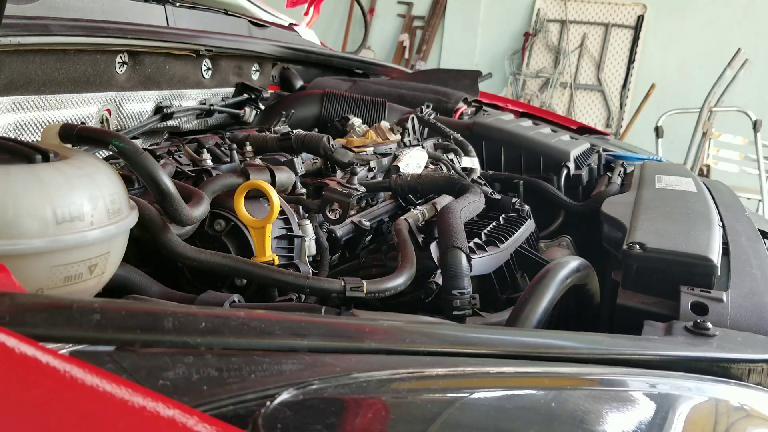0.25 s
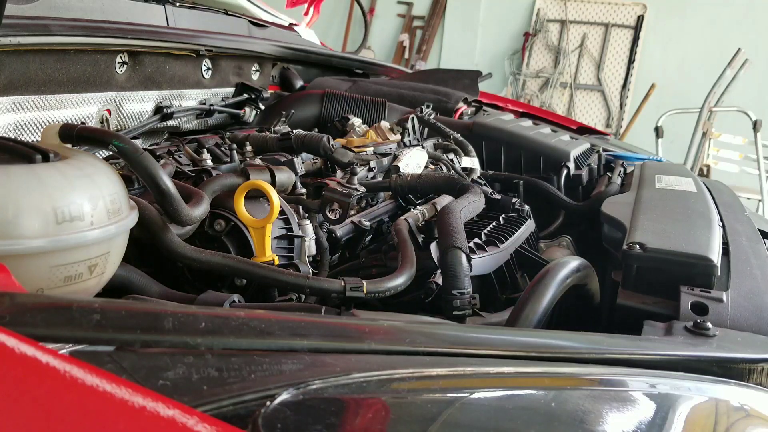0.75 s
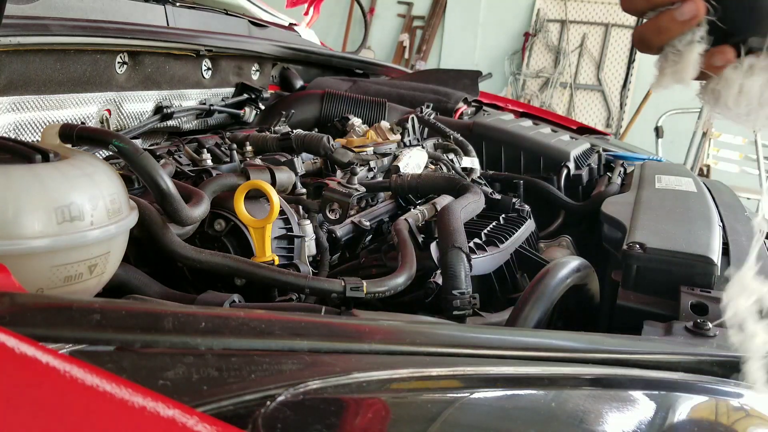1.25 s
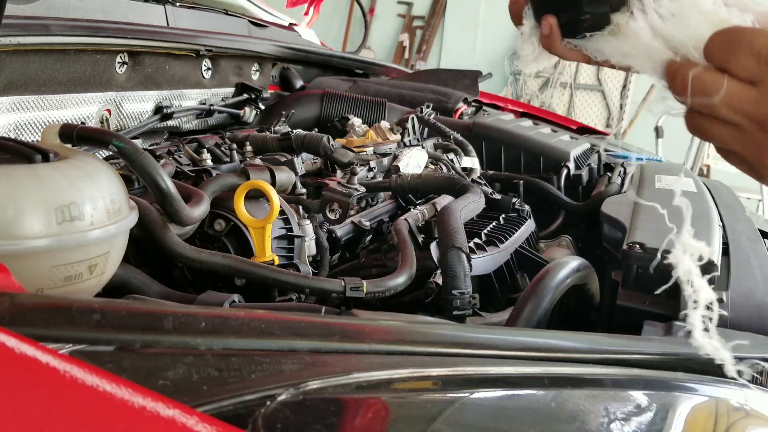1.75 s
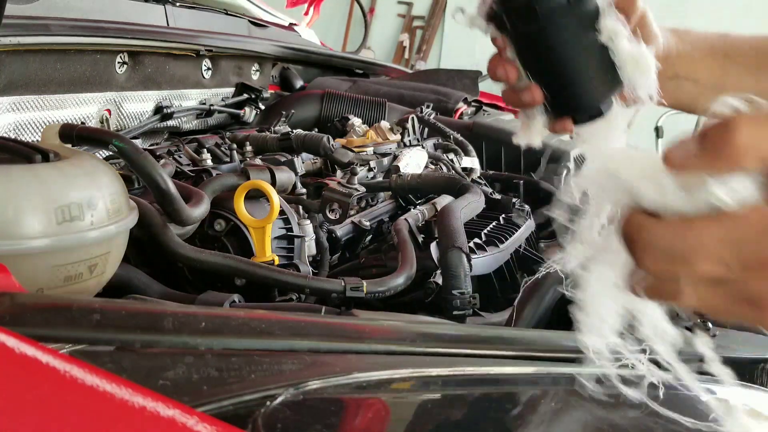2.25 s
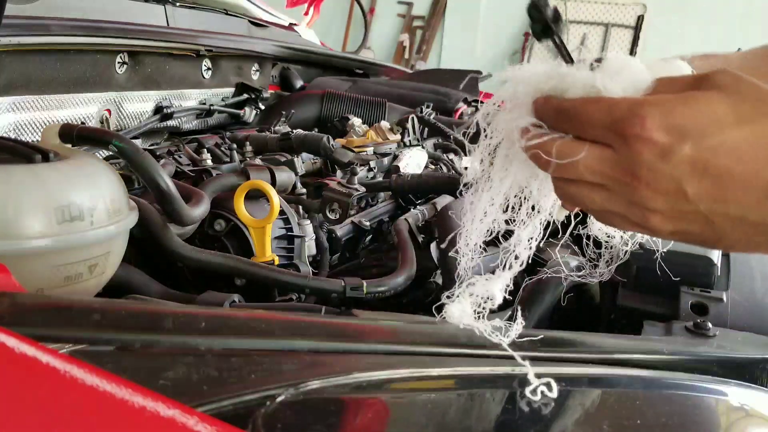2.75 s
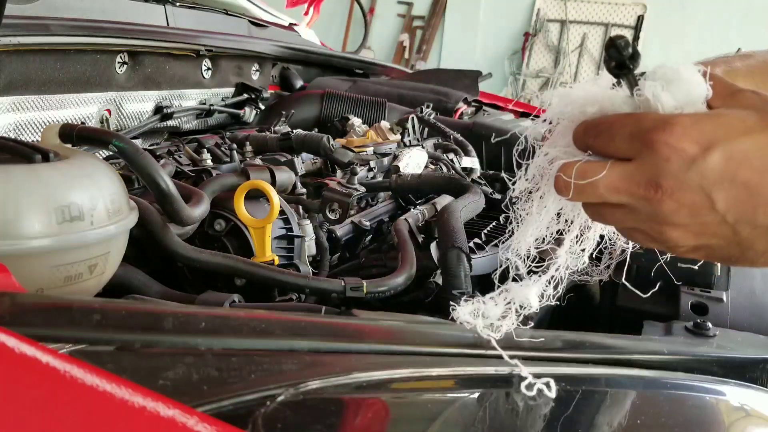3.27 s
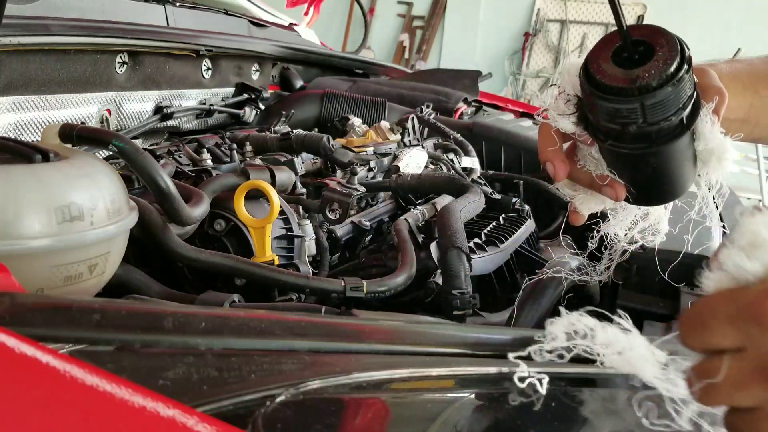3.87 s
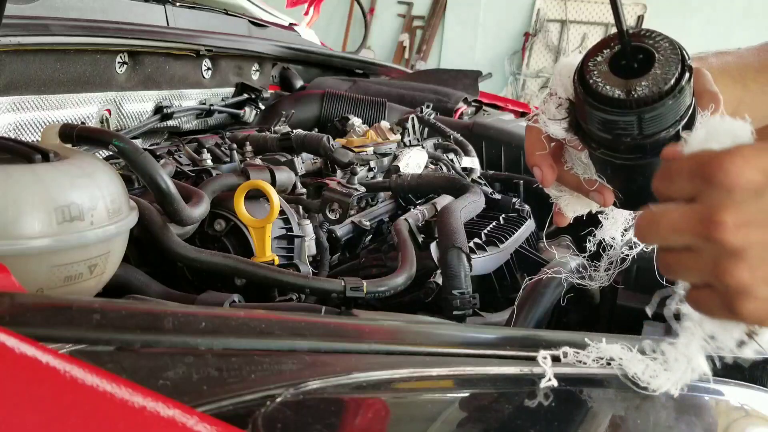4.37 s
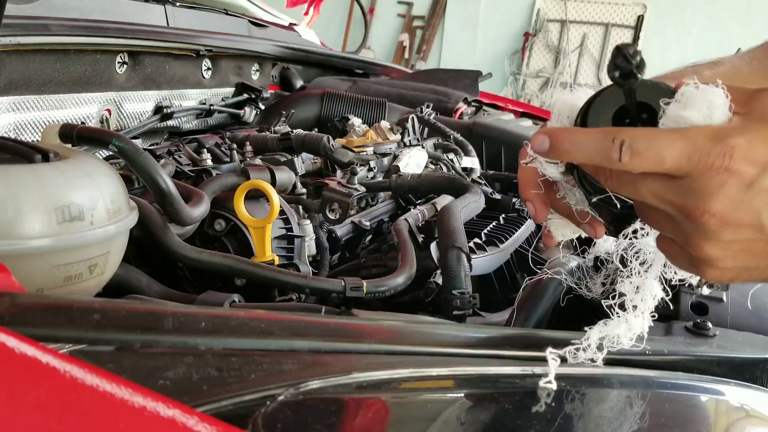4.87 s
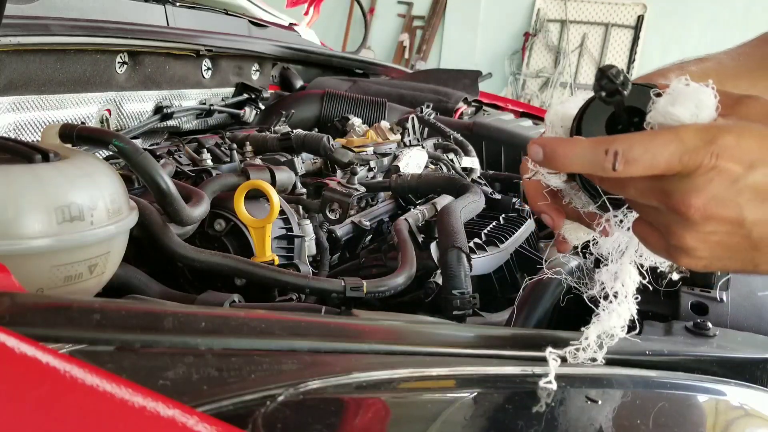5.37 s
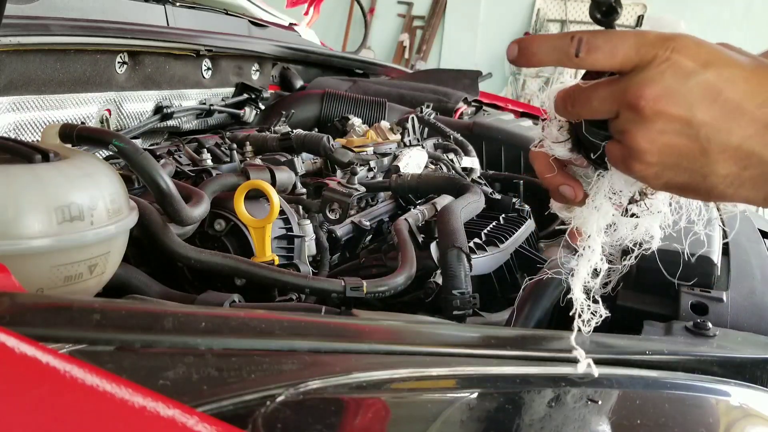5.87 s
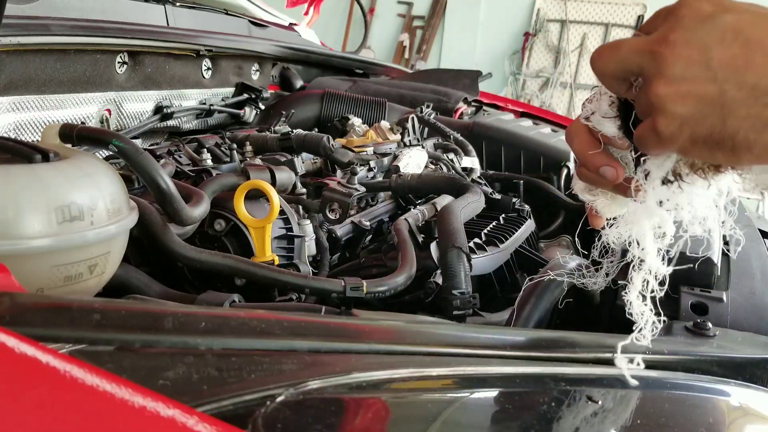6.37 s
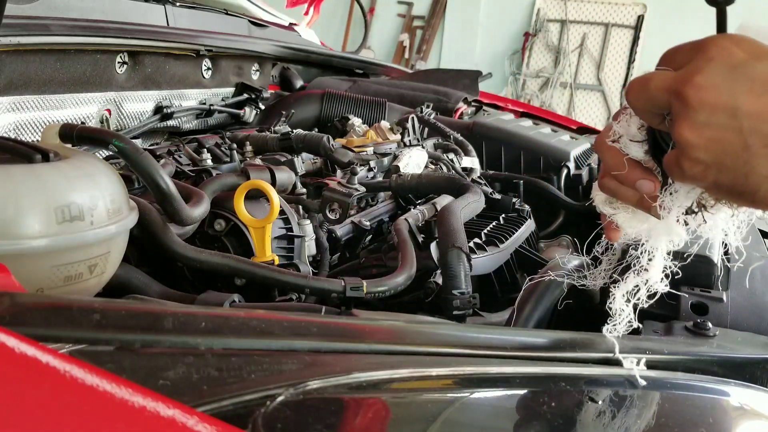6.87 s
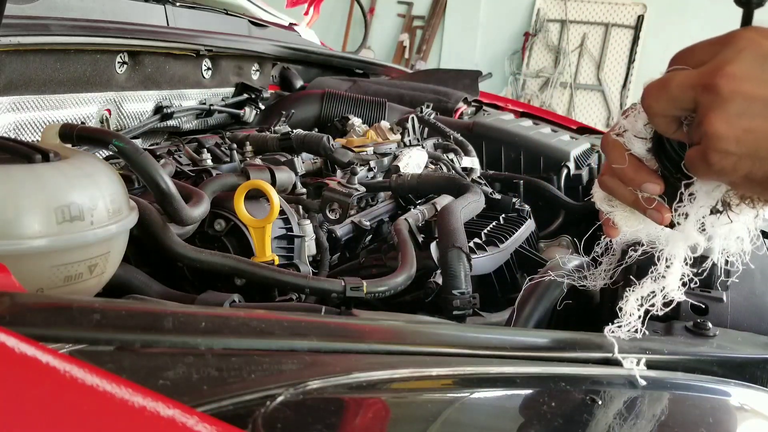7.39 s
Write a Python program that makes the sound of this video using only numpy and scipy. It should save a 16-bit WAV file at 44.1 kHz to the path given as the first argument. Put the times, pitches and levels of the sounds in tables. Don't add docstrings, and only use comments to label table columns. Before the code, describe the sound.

From a garage, a lumpy, throaty car exhaust swells, drops in pitch at a gear change, sweeps past and recedes, leaving cloth rustle and small ticks.

```python
import sys
import numpy as np
from scipy import signal
from scipy.fft import rfft, irfft
from scipy.io import wavfile
from scipy.ndimage import uniform_filter1d

SR = 44100
rng = np.random.default_rng(int(sys.argv[2]) if len(sys.argv) > 2 else 0)


def master_out(mix):
    frames = np.transpose(np.atleast_2d(mix))
    ceiling = np.clip(frames, -1, 1)
    pcm = np.round(ceiling * 32767).astype(np.int16)
    wavfile.write(sys.argv[1], SR, pcm)


def boost(x):
    u = np.asarray(x, float) / 20
    return 10 ** u


N = 336483
SLOW_RATE = 100

# frequency in Hz, level in dB.
PATH = [(30, -34.5), (50, -0.5), (75, 4), (100, 11.5), (125, 13.5), (150, 10), (180, 3), (215, -2.5),
        (240, -7.5), (280, -4.5), (315, -16.5), (350, -6.5), (410, -8), (500, -24)]
FAMILIES = {"low": (-49.5, 0.1, -42.5, 0.2), "firing": (-23, 1.4, -32.5, 1.07),
            "above": (-38, 2.1, -38, 1.94), "bark": (-42, -0.2, -23.5, 1.4),
            "growl": (-46.5, 0.38, -29, 1.92), "high": (-46.5, 0.5, -39.5, 0.82),
            "boom": (-53, .05, -45.5, 0.65), "rumble": (-36, -0.05, -25, 1.14)}


def evened(x):
    return x / np.sqrt(np.mean(abs(x) ** 2) + 1e-20)


def read(points, hz):
    f, value = np.transpose(points)
    return np.interp(np.log(hz + 1), np.log(f + 1), value)


def curves(rows, t):
    seconds, *columns = np.transpose(rows)
    return [np.interp(t, seconds, column) for column in columns]


def bumps(events, t):
    return sum(db * np.exp(-((t - s) / half) ** 2) for s, half, db in events)


def add(mix, s, sound):
    part = mix[round(s * SR):][:len(sound)]
    part += sound[:len(part)]


def resonate(x, hz, width):
    turn = np.exp(2j * np.pi * np.cumsum(hz * np.ones(len(x))) / SR)
    r = np.exp(-np.pi * width / SR)
    return 2 * (turn * signal.lfilter([1 - r], [1, -r], x / turn)).real


def resonate_twice(x, hz, width):
    return resonate(resonate(x, hz, width), hz, width)


def coloured(shape, patchy_db):
    frames, hz = N // 256 + 5, np.fft.rfftfreq(1024, 1 / SR)
    a, b, patches = rng.standard_normal((frames, 513, 3)).T
    patches = uniform_filter1d(patches, size=8, axis=0)
    patches = evened(uniform_filter1d(patches, size=12, axis=1))
    z = (a + 1j * b) * boost(read(shape, hz)[:, None] + patchy_db * patches)
    return evened(signal.istft(z, nperseg=1024, noverlap=768)[1][:N])


def wander(steps, hz):
    z = rng.standard_normal(steps) + 1j * rng.standard_normal(steps)
    smoothing = np.exp(-(np.fft.fftfreq(steps, 1 / SLOW_RATE) / hz) ** 2)
    return evened(np.fft.ifft(np.fft.fft(z) * smoothing))


def slow_times():
    return np.arange(N * SLOW_RATE // SR + 2) / SLOW_RATE


def swing(turns, size):
    t, slow = np.arange(N) / SR, np.arange(len(size)) / SLOW_RATE
    angle = 2 * np.pi * turns
    across = np.interp(t, slow, size.real) * np.cos(angle)
    along = np.interp(t, slow, size.imag) * np.sin(angle)
    return np.sqrt(2) * (across - along)


def family_db(name, t):
    # time in seconds, dB under the loudest.
    exhaust_loudness = [(0, -10.5), (.6, -7), (1.2, -2.5), (1.6, -1), (2.2, -3), (2.45, -6), (3, -2.5),
                        (3.5, -3.5), (4.2, -1), (4.8, -2.5), (5.15, -9), (5.5, -12.5), (5.65, -16.5),
                        (6, -18.5), (6.6, -32.5), (7.63, -29.5)]
    shift_times = [2.19, 2.31]
    street_echoes = {"low": [(1.4, 0.16, 4), (2.21, .07, -16.5), (6.64, 0.86, -10), (3.27, 0.15, -10.5),
                     (4.95, 0.095, 9.5)], "firing": [(2.25, 0.089, 4), (2.5, .2, -1), (2.92, 0.08, 3.5),
                     (3.12, 0.079, -6.5), (3.38, 0.066, 4), (3.5, 0.04, -5), (3.9, 0.26, 5.5),
                     (4.38, 0.068, 4.5), (4.72, 0.22, -16), (5.12, .07, -5.5)], "above": [(0.56, 0.34, 8.5),
                     (1.25, 0.041, 6), (4.5, 0.094, -26), (3.27, 0.27, 3), (5.72, .3, 8)],
                     "bark": [(.6, 0.18, 10.5), (.94, 0.13, 13.5), (2.1, 0.17, 16), (2.9, .6, -28.5)],
                     "growl": [(.15, 0.42, 11), (1.5, 0.07, 8), (2.7, 0.26, 5), (3.45, 0.11, 5)],
                     "high": [(.75, 0.17, 7), (1.6, .1, 4), (1.2, .1, 2), (5.03, 0.22, -2)],
                     "boom": [(.65, 0.45, 12.5), (4.5, 0.21, 11), (4.85, 0.23, 17.5), (5.1, 0.059, 16)],
                     "rumble": [(2.35, 0.31, 4)]}
    low_db, low_share, high_db, high_share = FAMILIES[name]
    gear = np.interp(t, shift_times, [0, 1])
    loud_db = curves(exhaust_loudness, t)[0]
    low_gear_db = low_db + low_share * loud_db
    high_gear_db = high_db + high_share * loud_db
    return (1 - gear) * low_gear_db + gear * high_gear_db + bumps(street_echoes[name], t)


def quiet_street():
    # frequency in Hz, level in dB per Hz.
    street_colour = [(15, -46), (25, -18), (59, -21.5), (94, -11.5), (122, 6), (165, -14.5), (210, -15.5),
                     (323, -34.5), (538, -33.5), (632, -29.5), (1860, -48), (4160, -51), (8380, -69.5),
                     (15600, -73)]
    return boost(-38.5) * coloured(street_colour, 1.9)


def birds():
    # start in seconds, length in seconds, first Hz, last Hz, level in dB.
    chirp_rows = [(5.69, .05, 4900, 4900, -68), (5.737, 0.044, 4300, 4300, -72),
                  (6.206, .08, 3770, 3800, -75), (6.64, 0.054, 4760, 4800, -69.5),
                  (6.665, .03, 4100, 3870, -75), (6.711, 0.044, 4250, 4430, -74),
                  (6.779, 0.049, 3100, 3700, -65), (6.767, 0.048, 4200, 4800, -70),
                  (6.824, 0.089, 3620, 3500, -73), (7.071, 0.089, 4400, 4437, -66.5),
                  (7.109, 0.12, 3730, 3480, -66.5), (7.214, 0.027, 3750, 3432, -66),
                  (7.468, 0.048, 4330, 3900, -67), (7.548, 0.02, 4980, 5100, -72)]
    out = np.zeros(N)
    for s, length, first_hz, last_hz, db in chirp_rows:
        steps = round(length * SR)
        hz = np.linspace(first_hz, last_hz, steps)
        breath = rng.standard_normal(steps)
        whistle = evened(resonate_twice(breath, hz, 420))
        whistle += .6 * evened(resonate(breath, hz, 1200))
        add(out, s, boost(db - 2) * evened(whistle) * signal.windows.tukey(steps, .5))
    tail = rng.standard_normal(9000) * boost(-60 * np.arange(9000) / SR / 0.44)
    return out + boost(-4.0) * signal.oaconvolve(out, tail / np.linalg.norm(tail))[:N]


def finger_ticks():
    # start in seconds, peak level in dB, ring in Hz.
    tick_rows = [(5.662, -62, 7070), (5.7054, -53, 6940), (5.899, -54.5, 6570), (6.0548, -55, 7230),
                 (6.09, -48.5, 6900), (6.119, -53, 7660), (6.525, -61, 6730), (7.0421, -63, 6330),
                 (7.081, -53, 6180), (7.218, -63, 6690), (7.5224, -53, 6450)]
    out = np.zeros(N)
    t = np.arange(2200) / SR
    touch = np.exp(-((t - .007) / .0055) ** 2) + .1 * np.exp(-t / .02)
    for s, db, hz in tick_rows:
        burst = rng.standard_normal(len(t)) * touch
        ring = resonate_twice(burst, hz + 500, 2600)
        ring += .4 * resonate_twice(burst, 11300, 1800) + 0.45 * resonate(burst, 4200, 1500)
        add(out, s, boost(db - 3.0) * ring / abs(ring).max())
    return out


def rag_strokes():
    # start in seconds, length in seconds, centre in Hz, width in Hz, level in dB.
    stroke_rows = [(0.671, 0.083, 9800, 9000, -62), (0.696, 0.39, 12560, 3190, -67),
                   (0.626, 0.26, 5400, 5000, -64), (1.856, .24, 13400, 7000, -69.5),
                   (2.475, .24, 12820, 3460, -72.5), (5.183, 0.12, 8900, 1300, -72),
                   (5.621, 0.17, 4500, 2400, -68.5), (5.953, 0.51, 4260, 2800, -68.5),
                   (6.188, 0.18, 7500, 5000, -75.5), (6.61, 0.38, 4230, 2000, -71),
                   (7.009, .17, 5100, 3420, -66.5), (7.123, 0.21, 3777, 1800, -71),
                   (7.439, 0.23, 4300, 2600, -67)]
    out = np.zeros(N)
    for s, length, hz, width, db in stroke_rows:
        steps = round(length * SR)
        roughness = evened(uniform_filter1d(rng.standard_normal(steps), size=150))
        grain = rng.standard_normal(steps) * boost(3.6 * roughness)
        hiss = resonate(resonate_twice(grain, hz, width), hz, width)
        add(out, s, boost(db) * evened(hiss) * np.hanning(steps) ** .7)
    return out


def nose_ringing(t, white):
    # centre in Hz, width in Hz, level in dB.
    nose_bands = [(1580, 300, -5), (2050, 240, -6), (2370, 380, 1), (2700, 300, -6), (3650, 460, -8),
                  (4300, 500, -10)]
    # time in seconds, nearness from 0 (coming) to 1 (abreast).
    nearness_rows = [
        (0, .1),
        (1.5, .2),
        (2.2, .85),
        (2.7, .1),
        (3.5, .15),
        (3.9, .95),
        (7.63, .95),
    ]
    near = curves(nearness_rows, t)[0]
    ringing = sum(boost(db) * evened(resonate_twice(white, hz, w)) for hz, w, db in nose_bands)
    smooth = coloured([(1200, -22.5), (1600, -1.5), (2500, 0), (3300, -24.0)], 2.4)
    return np.sqrt(1 - near) * evened(ringing) + np.sqrt(near) * smooth


def tyre_fizz(t, closer_db):
    # frequency in Hz, level in dB per Hz.
    fizz_colour = [(6500, -26.5), (8000, -8), (9200, 0), (11200, 4), (12300, 2.5), (14000, -11),
                   (16500, -18.5)]
    finest_colour = [(10000, -29), (12500, -6.5), (14000, 0), (16500, -2.5)]
    # time in seconds, share of the wheels in view.
    view_rows = [
        (2.05, 0.17),
        (2.8, .6),
        (4.1, 0.99),
        (4.9, .9),
        (5.1, .4),
        (5.32, .35),
        (5.42, 0),
    ]
    behind_wall_db = -16
    seen = curves(view_rows, t)[0]
    air_db = -61 + .45 * closer_db + behind_wall_db * (1 - seen)
    finest_db = -1.5 + 1.2 * np.minimum(air_db + 66.0, 0)
    fizz = coloured(fizz_colour, 1.2) + boost(finest_db) * coloured(finest_colour, 1.2)
    return boost(air_db - 3.0) * fizz


def road():
    # time in seconds, level in dB.
    tyre_loudness = [(0, -49), (0.025, -61), (0.9, -55), (1.75, -50), (2.6, -49), (3.9, -44.5),
                     (4.13, -42.5), (4.65, -44.5), (5.0, -47.5), (5.1, -49.5), (5.64, -63.5), (6.29, -62),
                     (6.6, -62), (7.63, -75)]
    # time in seconds, level in dB.
    nose_turn = [
        (1.5, 0.5),
        (2.2, -2),
        (3.1, 2),
        (3.8, 1),
        (5.0, -1.5),
        (5.6, -5),
        (6.3, -11),
        (6.6, -27),
    ]
    # frequency in Hz, level in dB per Hz.
    roar_colour = [(260, -19), (440, 2), (542, -6.5), (619, -1.5), (1000, -8), (1200, -12), (1850, -20.5),
                   (2000, -20.5), (2600, -28), (4400, -120)]
    hiss_colour = [(1800, -19), (2600, -1), (3100, -1.5), (3700, 0), (5000, -4), (6500, -7.5),
                   (8000, -14.5), (9500, -26), (13000, -45.5)]
    t = np.arange(N) / SR
    roar_db = curves(tyre_loudness, t)[0]
    closer_db = roar_db + 44
    nose_db = -58 + .45 * closer_db + curves(nose_turn, t)[0] - roar_db
    hiss_db = -56 + 0.83 * closer_db - roar_db
    hiss_db -= np.interp(t, [6.2, 6.6], [0, 7])
    white = rng.standard_normal(N)
    roar = boost(3.5) * coloured(roar_colour, 1.0)
    roar += boost(nose_db + 3.5) * nose_ringing(t, white)
    whine = evened(resonate_twice(white, 1580, 180))
    roar += boost(-12) * whine * np.exp(-((t - 3.05) / .5) ** 2)
    roar += boost(hiss_db + 1.3) * coloured(hiss_colour, 1.5)
    return boost(roar_db) * roar + tyre_fizz(t, closer_db)


def drones():
    # time in seconds, frequency in Hz, level in dB.
    far_tones = [
        [(6.0, 105.3, -36.5), (6.212, 108.9, -34.5), (6.812, 116.1, -43.5), (6.876, 109.6, -42),
         (7.076, 104.3, -39.5), (7.452, 107.9, -29.5), (7.63, 113.6, -38)],
        [(6.3, 137, -48), (6.714, 132.2, -35.5), (6.928, 143.5, -39.5), (7.458, 137, -56), (7.5, 138, -49)],
    ]
    t, slow = np.arange(N) / SR, slow_times()
    out = np.zeros(N)
    for rows in far_tones:
        hz, db = curves(rows, slow)
        start, end = rows[0][0], rows[-1][0]
        gate = np.interp(slow, [start - .1, start, end, end + .1], [0, 1, 1, 0])
        turns = np.cumsum(np.interp(t, slow, uniform_filter1d(hz, size=15))) / SR
        out += swing(turns, gate * boost(db) * (1 + 0.15 * wander(len(slow), 3.0)))
    return out


def rumble():
    hz = np.fft.rfftfreq(N, 1 / SR)
    gas_colour = [(20, -12.0), (60, -9.5), (200, 3), (300, -3.5), (480, -3.5), (620, -55.0)]
    colour_db = read(PATH, hz) + read(gas_colour, hz)
    noise = irfft(rfft(rng.standard_normal(N)) * boost(colour_db), N)
    return boost(family_db("rumble", np.arange(N) / SR)) * evened(noise)


def exhaust():
    # multiple of the engine cycle, level in dB.
    order_levels = [(2, -9), (3, 6), (4, -11.5), (5, 6.5), (6, -6), (7, -7.5), (8, 0.5), (9, -9.5), (10, 3),
                    (11, -0.5), (12, 1.5), (13, -2.5), (14, -7.5), (15, 4), (16, 3.5), (17, -2), (18, -0.5),
                    (19, -6), (20, 2.5), (21, 2.5), (22, -10), (23, -11.5), (24, 4), (25, -5), (26, 3),
                    (27, -5.5), (28, -5), (29, 1), (30, 6)]
    family_edges = [8, 9, 13, 14, 18]
    # time in seconds, engine cycles per second.
    engine_speed = [(0.0, 13.84), (0.3, 14.48), (1.05, 16.73), (1.35, 17.59), (1.8, 18.05), (1.95, 17.86),
                    (2.1, 16.68), (2.4, 13.57), (2.55, 12.97), (3.4, 13.1), (4.05, 12.15), (4.2, 12.34),
                    (4.35, 12.16), (4.5, 11.71), (4.95, 11.48), (5.3, 10.6), (5.8, 9.8), (7.63, 10.8)]
    # time in seconds, half length in seconds, loss in dB.
    firing_dips = [(0.198, 0.019, 6.5), (0.425, 0.056, 14), (0.693, 0.038, 6), (0.898, 0.023, 14),
                   (1.016, 0.038, 8.5), (1.114, 0.024, 6.5), (1.31, 0.029, 2.5), (1.581, 0.043, 7.5),
                   (1.802, 0.019, 3), (1.94, 0.029, 4.5), (2.139, 0.0082, 9.5), (3.06, 0.025, 13),
                   (4.228, 0.027, 19)]
    t, slow = np.arange(N) / SR, slow_times()
    cycle_hz = uniform_filter1d(curves(engine_speed, slow)[0], size=9)
    turns = np.cumsum(np.interp(t, slow, cycle_hz)) / SR
    levels_db = [family_db(name, slow) for name in FAMILIES]
    hidden = np.interp(slow, [3.2, 3.9, 5.5, 6.1], [1, .08, .08, 1])
    upper_orders = [(31 + i, -0.5 - 0.75 * i) for i in range(10)]
    out = np.zeros(N)
    for k, db in order_levels + upper_orders:
        boomy = k in (25, 30, 35)
        family = 6 if boomy else np.searchsorted(family_edges, k, "right")
        if k in (5, 8, 13):
            scattered = .12
        elif k <= 17 or boomy:
            scattered = .3
        else:
            scattered = .75
        echo = wander(len(slow), 1.8 + .3 * max(k - 14, 0))
        fade = np.sqrt(1 - scattered ** 2) + scattered * echo
        size = fade * boost(db + levels_db[family] + read(PATH, k * cycle_hz))
        if k == 8:
            size = size * boost(-bumps(firing_dips, slow))
        lag = .335 * k + .0325 * k ** 2
        offset = -lag if 8 <= k <= 17 else rng.random()
        size = size * np.exp(2j * np.pi * hidden * (rng.random() - .5))
        out += swing(k * turns + offset, size)
    return out


def scene():
    near_and_far = quiet_street() + birds() + finger_ticks() + rag_strokes()
    car = road() + drones() + rumble() + exhaust()
    return (near_and_far + car)[None]


def band_limit(x):
    return signal.sosfilt(signal.butter(12, 15720, fs=SR, output="sos"), x)


def record(dry):
    finished = dry * signal.windows.tukey(N, 500 / N)
    return band_limit(finished)


dry = scene()
out = record(dry)
master_out(out)
```